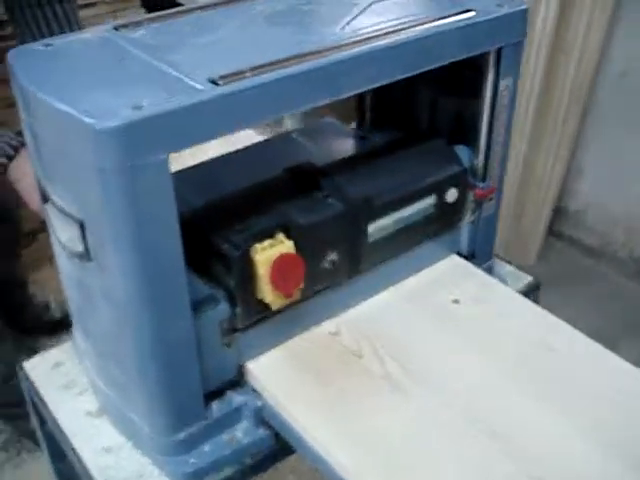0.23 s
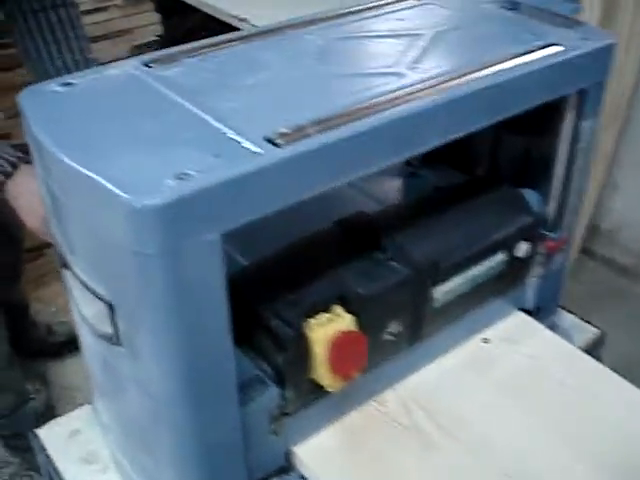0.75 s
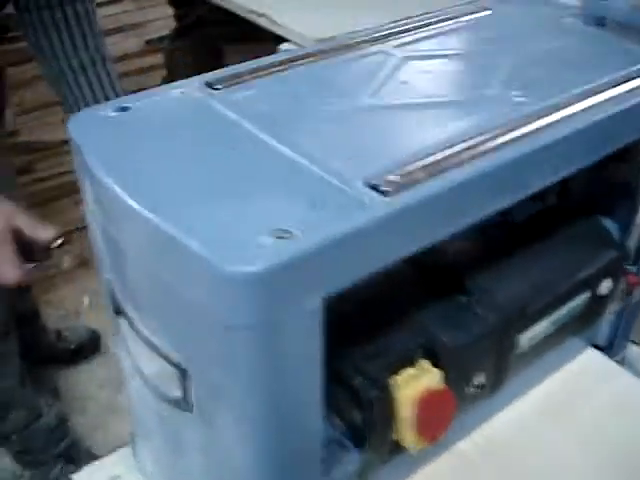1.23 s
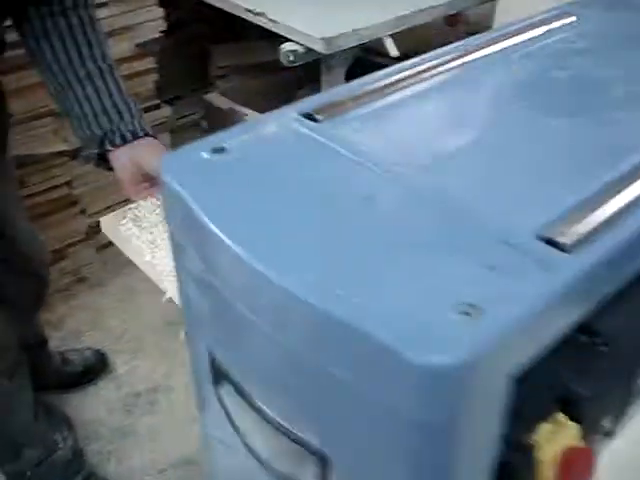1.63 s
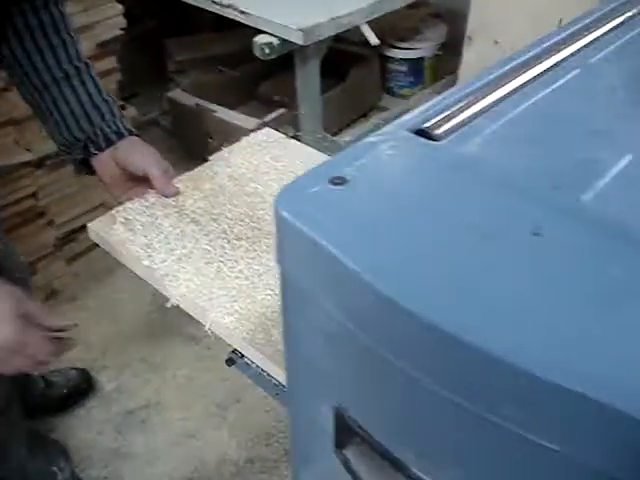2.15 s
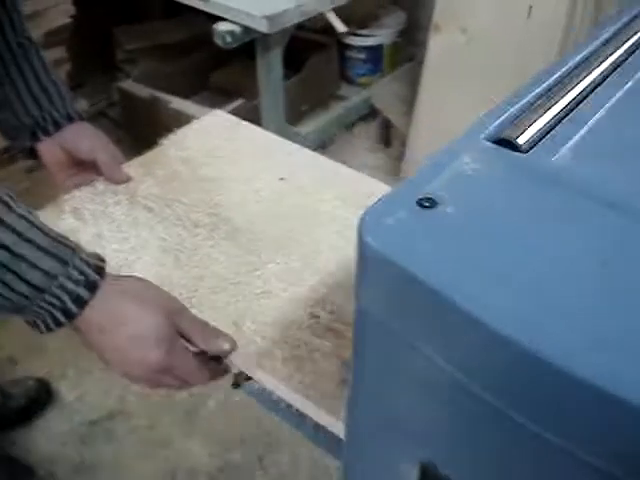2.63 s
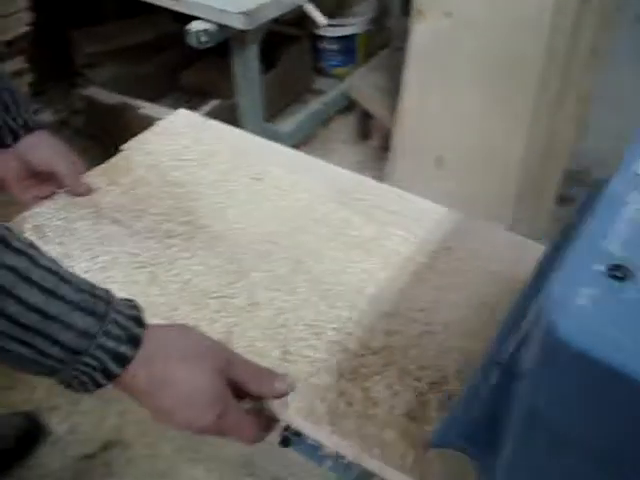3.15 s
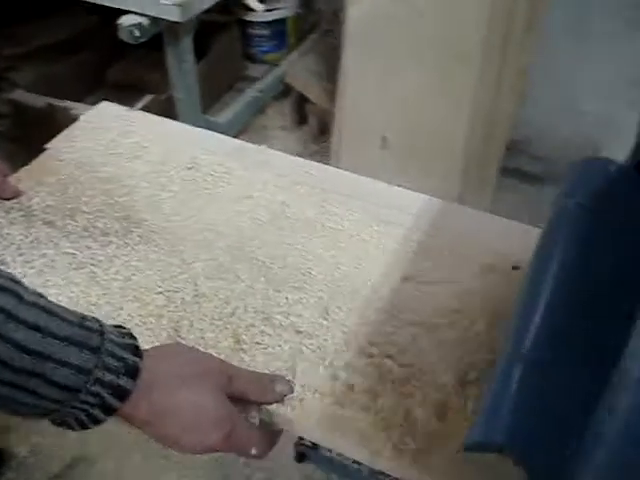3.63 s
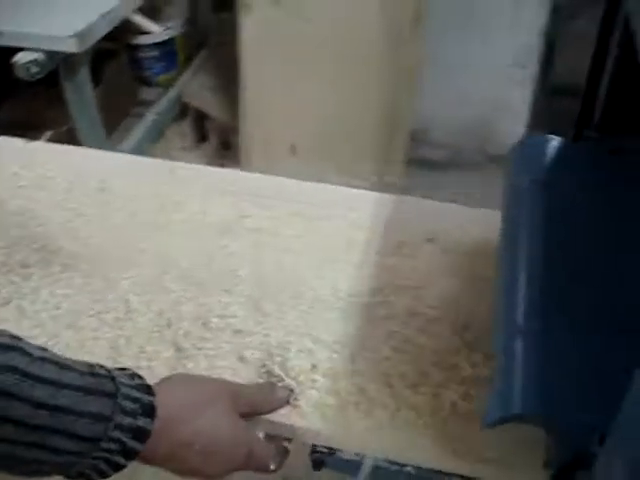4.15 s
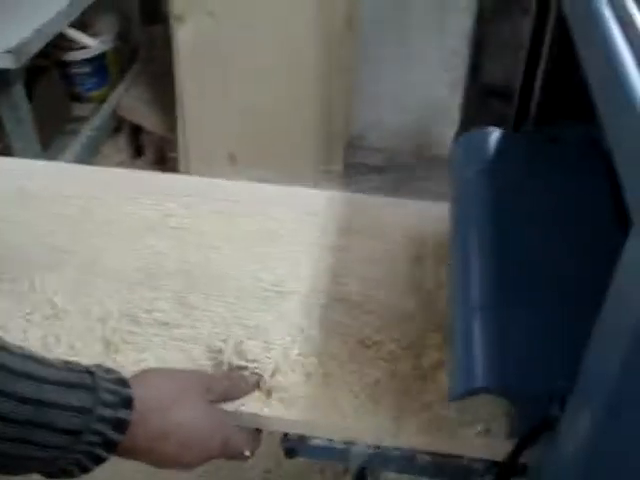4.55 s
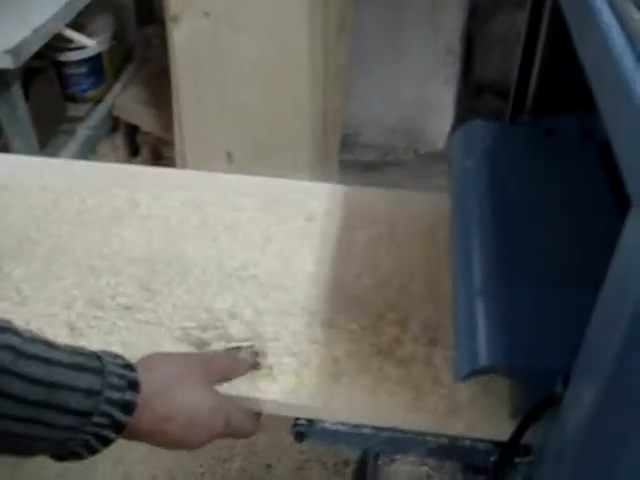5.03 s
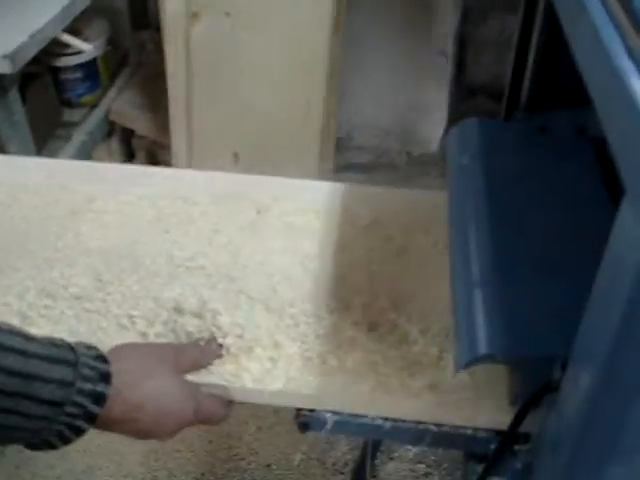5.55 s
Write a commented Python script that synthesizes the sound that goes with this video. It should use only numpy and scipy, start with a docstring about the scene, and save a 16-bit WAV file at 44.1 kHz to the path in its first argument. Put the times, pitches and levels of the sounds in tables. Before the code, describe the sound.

In a small workshop, a thickness planer is already cutting a board at full volume: a dense, buzzing drone with raspy tearing of chips. Pitch creeps up until about 2.6 seconds as the handheld microphone moves round the housing, changing the tone colour and exposing motor whine. The pitch then sags to its lowest near 4.9 seconds and climbs back. Single overtones ring out briefly throughout.

```python
"""A bench thickness planer cuts a wide board in a small workshop; knife slaps, a harmonic series, make a drone.
From the start slaps tear off noisy chips over belt hum and bench rumble; brief resonances lift single harmonics.
Around 1.5 s the listener rounds the housing and the drone changes colour; pitch and geared motor whine rise.
The motor and fan stand out most near 2.6 s, when the head turns fastest; filtered noise puffs are roller
knocks throughout and two very short clicks near 3.8 s. The pitch sinks until 4.9 s, then climbs again."""
import sys
import numpy as np
from scipy import signal
from scipy.fft import rfft, irfft
from scipy.io import wavfile
from scipy.ndimage import uniform_filter1d, map_coordinates

SR = 44100
rng = np.random.default_rng(int(sys.argv[2]) if len(sys.argv) > 2 else 0)


def dump_mix(stems):
    """Bounce the given channels to the path in sys.argv[1] as a 16-bit WAV at rate SR."""
    frames = np.atleast_2d(stems).T  # one column per channel
    limited = np.clip(frames, -1, 1)  # hard clip at full scale
    pcm = np.round(limited * 32767).astype(np.int16)
    wavfile.write(sys.argv[1], SR, pcm)


N = 255780
TIME = np.arange(N) / SR
FRAMES = np.arange(0, N + 220, 220) / SR  # coarse time grid of the slow curves [s]

# rotation of the cutter head: (time [s], speed [turns per second])
SPEED = [(0.0, 125.7), (0.26, 126.0), (0.73, 123.2), (1.42, 129.9), (1.68, 129.3), (1.78, 130.1),
         (2.0, 130.4), (2.23, 132.8), (2.55, 135.0), (3.02, 132.1), (3.15, 130.3), (3.47, 122.2),
         (3.91, 118.3), (4.39, 115.9), (4.52, 114.1), (4.9, 111.1), (5.06, 111.8), (5.17, 113.7),
         (5.39, 115.1), (5.56, 119.5), (5.59, 119.3), (5.77, 125.0), (5.8, 126.7)]
# loudness of the cut: (time [s], mids [dB], upper mids [dB], treble [dB])
CUT = [(0.0, -24.5, -19, -39.5), (0.05, -23.5, -17.5, -37.5), (0.53, -25, -22.5, -35),
       (0.71, -29, -20.5, -33), (1.55, -23.5, -19.5, -34), (1.82, -22, -20, -35.5), (1.99, -30, -23.5, -35),
       (2.28, -26.5, -21, -32), (3.23, -26.5, -18, -35.5), (3.36, -28, -18, -38), (3.41, -23, -21, -38),
       (4.67, -24, -18.5, -34), (4.9, -31, -20.5, -34.5), (5.02, -24.5, -20.5, -37.5),
       (5.38, -28, -17.5, -33.5), (5.46, -20.5, -18, -35.5), (5.65, -27, -22, -40),
       (5.8, -28.5, -20, -36.5)]
# transmission of low tones through the housing: (frequency [Hz], level [dB])
HOUSING = [(120, -65), (225, -58), (247, -56.5), (270, -57.5), (300, -54), (340, -48.5), (365, -63),
           (395, -40), (440, -35), (490, -44.5), (520, -37), (545, -52)]


def gain_of(db):
    """Amplitude ratio of a level: 20 dB is a factor of ten."""
    return 10 ** (np.asarray(db) / 20)


def evened(x):
    """Normalisation to an rms of 1, so that levels can be set afterwards."""
    return x / np.sqrt(np.mean(abs(x) ** 2) + 1e-20)


def read(points, hz):
    """A spectrum, joined by straight lines over log frequency."""
    f, value = np.transpose(points)
    return np.interp(np.log(hz + 1), np.log(f + 1), value)


def curves(rows, t):
    """Linear interpolation of every column of a table of curves at the times t."""
    s, *columns = np.transpose(rows)
    return np.array([np.interp(t, s, c) for c in columns])


def add(mix, s, sound):
    """Superposition: a sound is summed into the mix from the time s."""
    part = mix[round(s * SR):][:len(sound)]
    part += sound[:len(part)]


def drift(per_s, count):
    """Noise under a Gaussian low-pass: independent slow curves of joint rms 1, frames x count."""
    size = 2 * len(FRAMES)
    rates = np.fft.rfftfreq(size, FRAMES[1])[:, None]
    spectrum = rfft(rng.standard_normal((size, count)), axis=0)
    smooth = irfft(spectrum * np.exp(-(rates / per_s) ** 2), axis=0)
    return evened(smooth[:len(FRAMES)])


def coloured(x, spectrum):
    """Linear filtering by a fixed magnitude response, with the result at rms 1."""
    gain = gain_of(read(spectrum, np.fft.rfftfreq(N, 1 / SR)))
    return evened(irfft(rfft(x) * gain, N))


def knife(turns, size=1024, count=92):
    """Fourier synthesis: a slap repeated once a turn is a harmonic series that changes as the board feeds."""
    # colour of the knife slaps: (frequency [Hz], relative level [dB])
    slap_colour = [(1100, -3.5), (1500, -1), (2000, -2.5), (2700, -3), (3400, -2.5), (4200, -7.5),
                   (5200, -10), (7000, -23), (10000, -40)]
    slap_db, slap_follows = -33.5, 0.95  # base level [dB], gain per dB of the cut [dB]
    order, place = np.arange(1, count + 1), np.arange(size) / size
    hz = curves(SPEED, FRAMES).T * order
    ring = drift(per_s=1.8, count=size) + .28 * drift(per_s=9, count=size)
    blow = burst(place, width=.13, second=0.39, floor=0.3)
    slap = evened(rfft(ring * blow, axis=1)[:, 1:count + 1])
    # the blow itself pushes all low harmonics in step, at the middle of the turn
    slap = slap - 0.67 * np.exp(-hz / 1900) * (-1) ** order
    # bending waves in the board bring some bands to the ear a little earlier than others
    lag = uniform_filter1d(drift(per_s=0.74, count=count), size=6, axis=1)
    lag = evened(uniform_filter1d(lag, size=6, axis=1))
    slap = slap * np.exp(1j * 1.33 * lag)
    # the local mean over neighbouring harmonics is flattened before the colour is applied
    lines = slap / np.sqrt(uniform_filter1d(abs(slap) ** 2, size=7, axis=1))
    lines = lines * gain_of(slap_db + read(slap_colour, hz) + slap_follows * cut_db(hz))
    # the lowest harmonics are radiated by housing and board as a whole
    housing_db = read(HOUSING, hz[:, :4]) + 1.9 * drift(per_s=11.5, count=4)
    low_db = np.hstack([housing_db, drone_db(hz[:, 4:9])])
    low = slap[:, :9]
    lines[:, :9] = gain_of(low_db) * low / np.sqrt(abs(low) ** 2 + 0.093)
    lines = lines * gain_of(dip_db(hz))
    # a resonance holds its harmonic steady while it lasts
    song = singing(hz)
    held_phase = np.angle(slap[song.argmax(0), order - 1])
    lines = lines / (1 + (song / gain_of(-30.0)) ** 2) + song * np.exp(1j * held_phase)
    # one waveform per frame, read out at the angle of the cutter head
    wave = irfft(np.pad(lines, ((0, 0), (1, 0))), size, axis=1) * size / np.sqrt(2)
    return map_coordinates(wave, [TIME / FRAMES[1], turns % 1 * size], order=1, mode="grid-wrap")


def burst(turn, width, second, floor):
    """Periodic excitation: the proud knife bites, its mate follows more weakly, echoes fill the gaps."""
    def pass_of(u):
        return np.exp(-((u % 1 - .5) / width) ** 2)
    return np.sqrt(pass_of(turn) + second ** 2 * pass_of(turn + .5) + floor ** 2)


def bite(turns, spread_db):
    """Random amplitude modulation: the grain resists a little differently on every turn."""
    index = turns.astype(int)
    strength = gain_of(spread_db * rng.standard_normal(index[-1] + 1))
    return uniform_filter1d(strength[index], size=30)


def cut_db(hz):
    """Level relative to the mean power of the cut in each band, frames x harmonics."""
    # centres of the three bands of the cut: (frequency [Hz])
    band_centres = [1500, 3000, 7000]
    swing = curves(CUT, FRAMES).T
    swing = swing - 10 * np.log10(np.mean(gain_of(swing) ** 2, 0))
    return np.array([np.interp(f, band_centres, row) for f, row in zip(hz, swing)])


def drone_db(hz):
    """Directional radiation: the board's drone changes colour from infeed to outfeed, frames x harmonics."""
    # drone in front of the infeed: (frequency [Hz], level of a harmonic [dB])
    infeed = [(620, -32), (750, -31), (880, -34.5), (1000, -34), (1130, -36)]
    # drone beside and behind the machine: (frequency [Hz], level of a harmonic [dB])
    outfeed = [(570, -39), (655, -38.5), (705, -28), (780, -31), (920, -33.5), (1040, -31), (1100, -40),
               (1190, -36.5)]
    pass_s, pass_length_s = 1.47, .8  # when the listener rounds the housing, and how long it takes
    follows, wander_db = .3, 1.36  # gain per dB of the cut [dB], wander of each harmonic as the board feeds
    passed = np.clip((FRAMES[:, None] - pass_s) / pass_length_s + .5, 0, 1)
    colour = (1 - passed) * read(infeed, hz) + passed * read(outfeed, hz)
    return colour + follows * cut_db(hz) + wander_db * drift(per_s=7.5, count=hz.shape[1])


def dip_db(hz):
    """Interference: sound from two paths cancels in part in one narrow, sliding band, frames x harmonics."""
    # the dip slides as board and listener move: (time [s], centre [Hz])
    dip_centre = [(0, 1440), (.75, 1120), (1.25, 914), (1.85, 726), (3.0, 676), (4.3, 586), (5.2, 574),
                  (5.75, 734)]
    depth_db, width_hz = -8, 146
    return depth_db * .5 ** np.square(2 * (hz - curves(dip_centre, FRAMES).T) / width_hz)


def singing(hz):
    """Resonance: harmonics inside a resonance of the moving board swell, its skirts lift the neighbours."""
    # resonances of the board: (time [s], centre [Hz], length [s], width [Hz], level [dB])
    rings = [(0.254, 2590, 0.63, 280, -29), (0.48, 937, 0.21, 217, -25), (0.588, 3050, 0.6, 192, -30),
             (1.01, 2620, 0.11, 280, -28.5), (1.356, 3720, 0.54, 200, -32), (1.663, 1183, 0.57, 99, -28),
             (1.679, 3120, 0.15, 100, -26), (1.813, 1503, 0.13, 216, -25.5), (1.86, 2906, 0.27, 103, -25),
             (2.05, 1050, .45, 100, -29.5), (2.297, 1700, 0.33, 200, -30.5),
             (2.368, 4230, 0.22, 450, -35.5), (2.652, 1320, 0.33, 100, -28), (2.782, 2230, .3, 250, -35),
             (3.04, 3880, 0.18, 247, -33), (3.122, 980, 0.12, 218, -26), (3.4, 487, 0.2, 100, -37),
             (3.437, 1192, 0.15, 100, -23), (3.55, 3000, 0.21, 200, -30.5), (3.752, 3260, 0.32, 198, -30.5),
             (3.98, 1740, 0.16, 220, -29), (4.122, 827.4, 0.69, 99, -24), (4.2, 1410, 0.48, 100, -29.5),
             (4.304, 2536, 0.22, 200, -31.5), (4.82, 3820, 0.089, 103, -28), (4.852, 767, 0.49, 99, -29.5),
             (5.004, 2832, .3, 100, -26.5), (4.998, 2318, 0.26, 160, -27.5), (5.285, 1032, 0.64, 100, -28),
             (5.367, 2224, 0.33, 196.4, -29.5)]
    edge = 2.63  # how abruptly a resonance comes and goes (2 = a bell curve)

    def swell(s, length):
        return np.sqrt(.5 ** (abs(2 * (FRAMES[:, None] - s) / length) ** edge))
    return sum(gain_of(db) * swell(s, length) / (1 + np.square(2 * (hz - centre) / width) ** 2)
               for s, centre, length, width, db in rings)


def chips(turns):
    """Modulated noise: torn fibres linger in the hood, and a fluttering fizz comes straight from the knife."""
    # colour of the tearing wood: (frequency [Hz], relative level [dB])
    tear_colour = [(30, -47), (170, -31), (260, -14), (420, -7), (800, 1.5), (1300, 2), (2400, 5),
                   (3500, 3), (5000, 0), (7000, -10), (10000, -22)]
    # colour of the fizz at the knife edge: (frequency [Hz], relative level [dB])
    fizz_colour = [(300, -41), (2000, -13.5), (4000, -21.5), (5200, -5), (7000, -5), (10000, -12)]
    body = coloured(tearing(turns, width=.15, second=0.65, floor=.9, spread_db=1.6), tear_colour)
    flutter = gain_of(1.7 * np.interp(TIME, FRAMES, drift(per_s=50, count=1)[:, 0]))
    spray = tearing(turns, width=.16, second=.25, floor=.3, spread_db=.9)
    fizz = coloured(spray * flutter, fizz_colour)
    fizz_db = curves(CUT, TIME)[2] + 2.95  # follows the treble of the cut
    return body * gain_of(tear_db()) + fizz * gain_of(fizz_db)


def tearing(turns, width, second, floor, spread_db):
    """Impulsive fracture noise: fibres tear in a crackling burst at each pass of a knife."""
    grains = np.repeat(rng.standard_normal(N), 12)[:N]  # a new strength every 12 samples
    crackle = rng.standard_normal(N) * gain_of(1.1 * grains)
    return crackle * burst(turns, width, second, floor) * bite(turns, spread_db)


def tear_db():
    """Work and radiated power: wood tears louder where the cut is heavier, and unevenly along the grain."""
    base_db, follows, patchy_db = -26.5, 0.42, 1.67  # level, dB per dB of the cut, spread between patches
    effort = curves(CUT, FRAMES)[1]
    level = base_db + follows * (effort - effort.mean()) + patchy_db * drift(per_s=24, count=1)[:, 0]
    return np.interp(TIME, FRAMES, level)


def clicks():
    """Damped noise: two very short, bright clicks."""
    # clicks: (time [s], peak level [dB])
    click_peaks = [(3.7555, -8), (3.8745, -12)]
    return blows(click_peaks, low_hz=1500, high_hz=8000, decay=0.00067)


def motor(turns):
    """Rotational tones: shaft and cooling fan sing wavering tones, geared to the cutter head."""
    # tones of the motor: (multiple of the motor's speed)
    tone_orders = [1, 12, 16, 16.42]
    # tones of the motor, in the same order: (level [dB])
    tone_db = [-58, -46, -43, -51]
    # how openly the motor is heard: (time [s], gain [dB])
    openness = [(0, -31), (.7, -15), (1.3, -6), (2, -5.5), (2.6, 0.5), (3.1, -3.5), (3.5, -15), (4.5, -17),
                (5.8, -17)]
    motor_turns = 1.801 * turns  # turns of the motor per turn of the cutter head
    waver_db = 3 * drift(per_s=7, count=len(tone_db))
    levels = gain_of(waver_db + curves(openness, FRAMES).T + tone_db)
    return np.sqrt(2) * sum(np.interp(TIME, FRAMES, level) * np.sin(2 * np.pi * order * motor_turns)
                            for order, level in zip(tone_orders, levels.T))


def belt(turns):
    """Beating: the belt drive hums through the housing, close in pitch to the third harmonic."""
    ratio = 3.087  # hum cycles per turn of the cutter head
    level_db = read(HOUSING, ratio * curves(SPEED, TIME)[0]) - 6.5
    return np.sqrt(2) * gain_of(level_db) * np.sin(2 * np.pi * ratio * turns)


def knocks():
    """Impact: the board knocks on the feed rollers in short puffs of low noise."""
    # knocks on the rollers: (time [s], peak level [dB])
    roller_hits = [(.314, -45), (1.855, -33), (2.972, -38), (3.44, -45), (4.145, -43), (4.838, -32)]
    return blows(roller_hits, low_hz=35, high_hz=330, decay=0.0076)


def blows(rows, low_hz, high_hz, decay):
    """Damped impulses: noise that dies exponentially, with a time constant decay [s], in one band."""
    out, t = np.zeros(N), np.arange(SR // 5) / SR
    band = signal.butter(2, [low_hz, min(high_hz, SR / 2 - 1)], "band", fs=SR, output="sos")
    for s, db in rows:
        puff = signal.sosfilt(band, rng.standard_normal(len(t)) * np.exp(-t / decay))
        add(out, s, gain_of(db) * puff / abs(puff).max())
    return out


def bench():
    """Structure-borne noise: the feed shakes the bench in an uneven rumble."""
    # colour of the rumble: (frequency [Hz], relative level [dB])
    rumble_colour = [(15, 3.5), (50, 6), (100, -0.5), (200, -0.5), (400, -18), (2000, -47)]
    lumps = gain_of(2.4 * np.interp(TIME, FRAMES, drift(per_s=16, count=1)[:, 0]))
    rumble = coloured(rng.standard_normal(N), rumble_colour)
    return gain_of(-59.5) * evened(rumble * lumps)


def scene():
    """Phase locking: the integral of speed, the cutter head's angle, times slaps, chips and the whole drive."""
    turns = np.cumsum(curves(SPEED, TIME)[0]) / SR + 3 / 4
    cut = knife(turns) * bite(turns, spread_db=1.16) + chips(turns)
    return (cut + clicks() + motor(turns) + belt(turns) + knocks() + bench())[None]


def record(dry):
    """Band limitation: a linear-phase low-pass at 10150 Hz removes the highest treble."""
    low_pass = signal.firwin(801, 10150, window=("kaiser", 9), fs=SR)
    return signal.oaconvolve(dry, low_pass[None], "same")


dry = scene()
out = record(dry)
dump_mix(out)
```